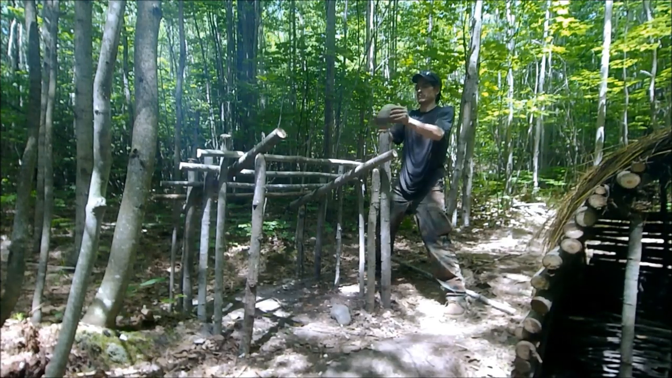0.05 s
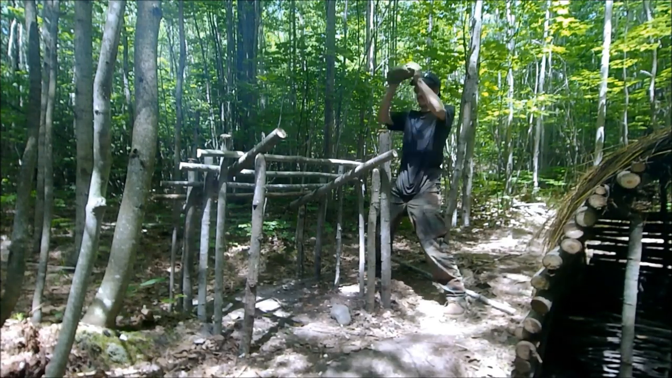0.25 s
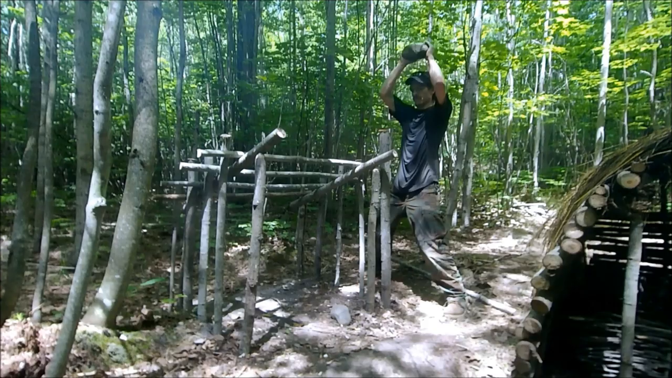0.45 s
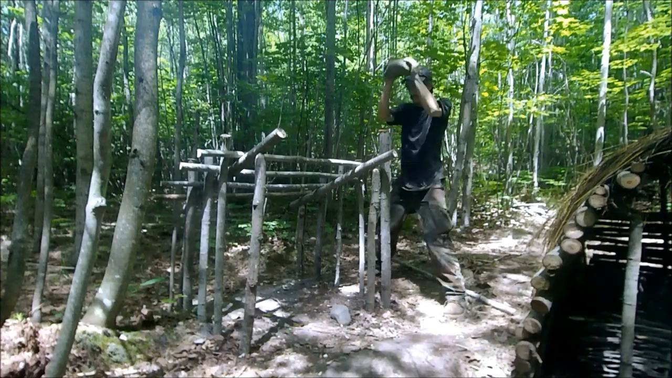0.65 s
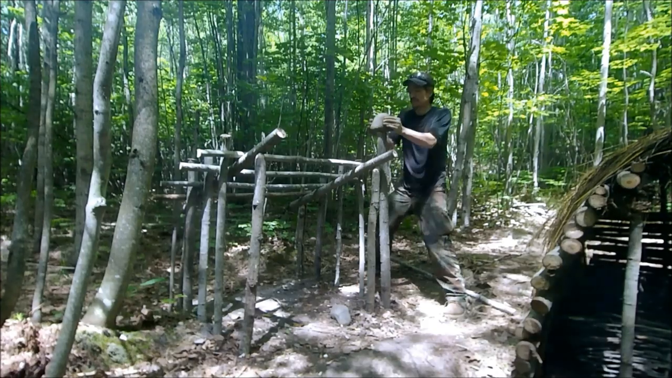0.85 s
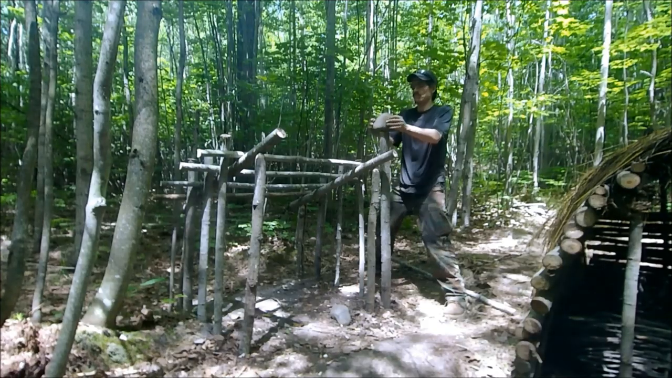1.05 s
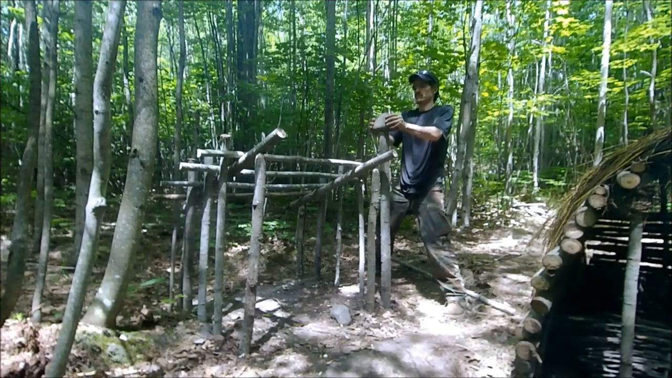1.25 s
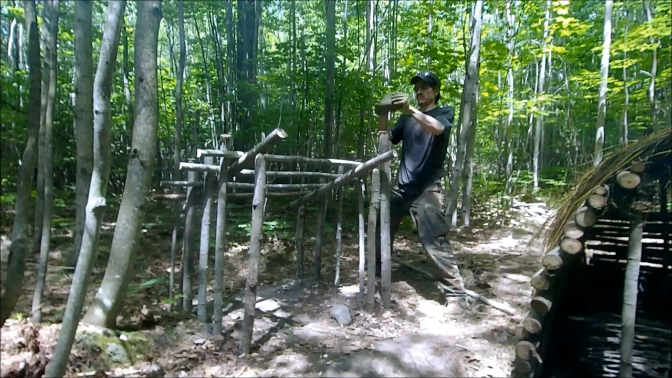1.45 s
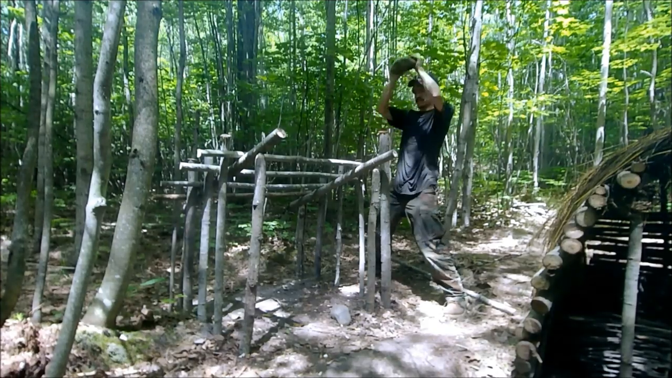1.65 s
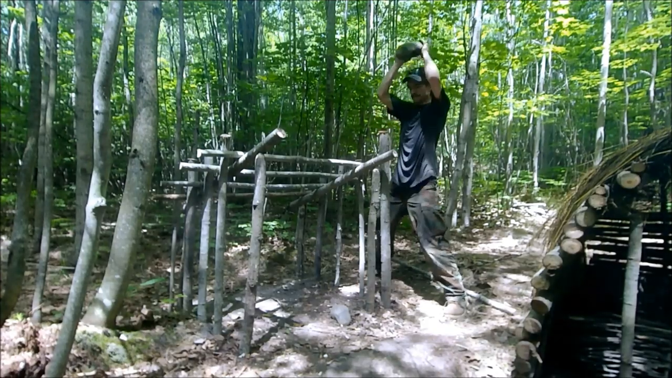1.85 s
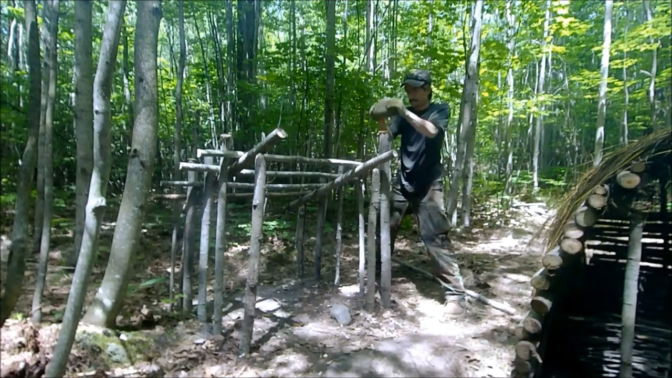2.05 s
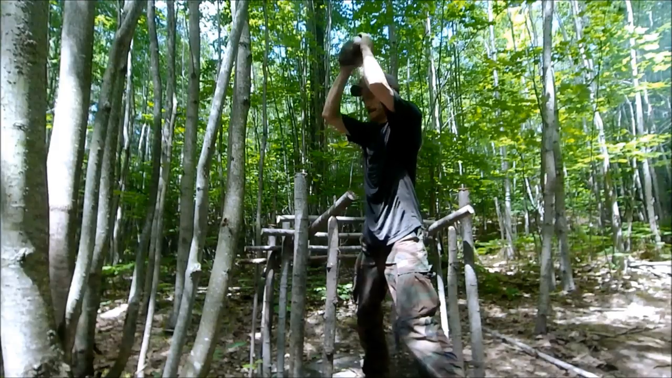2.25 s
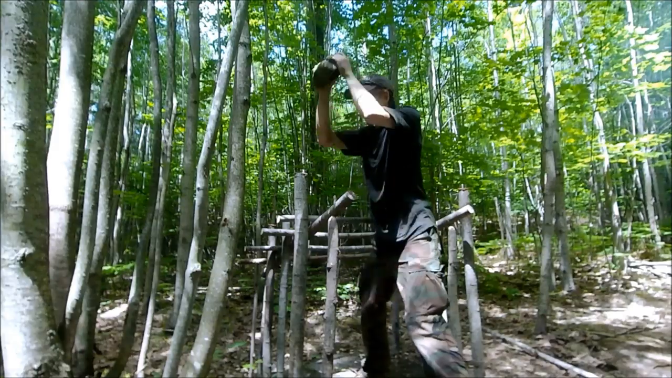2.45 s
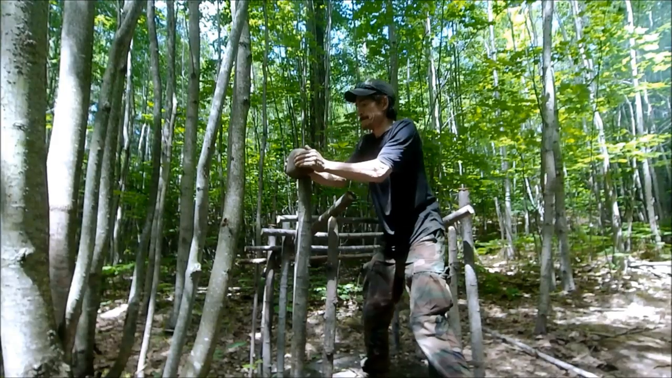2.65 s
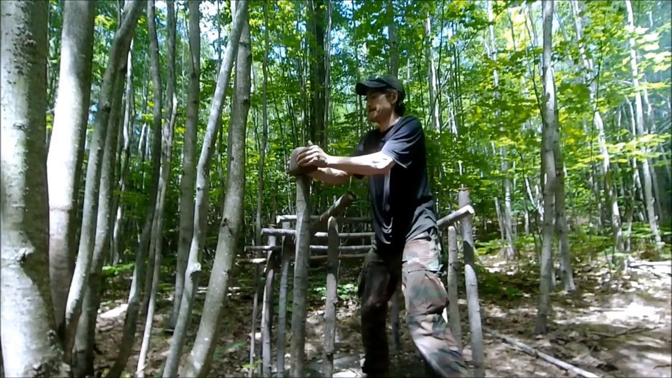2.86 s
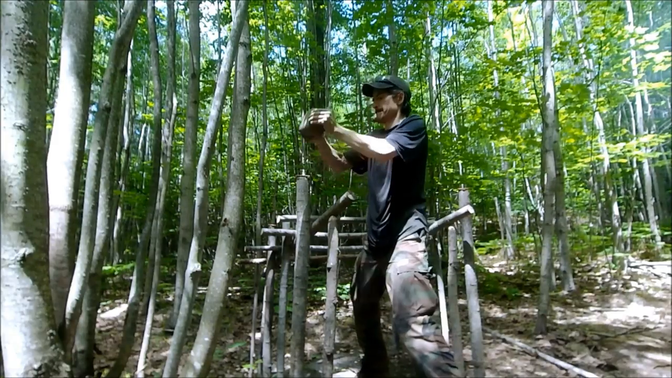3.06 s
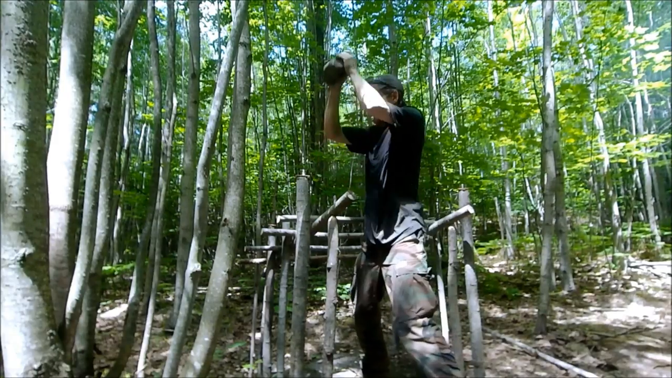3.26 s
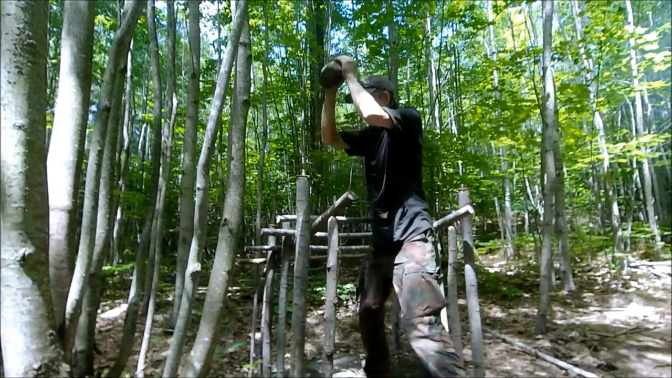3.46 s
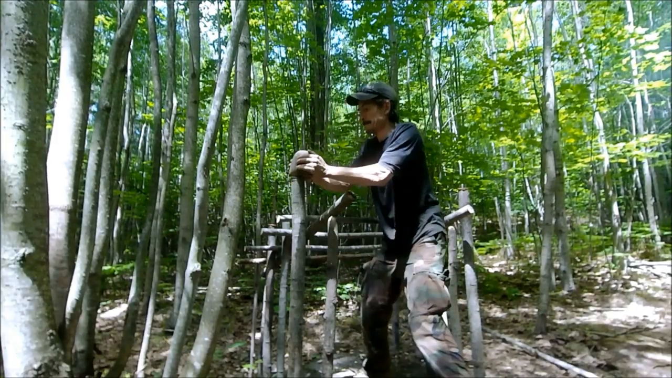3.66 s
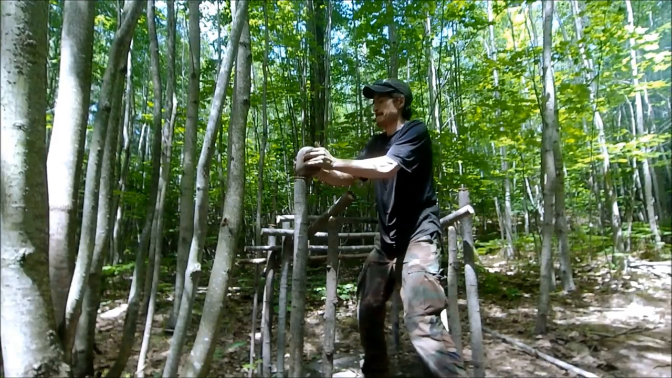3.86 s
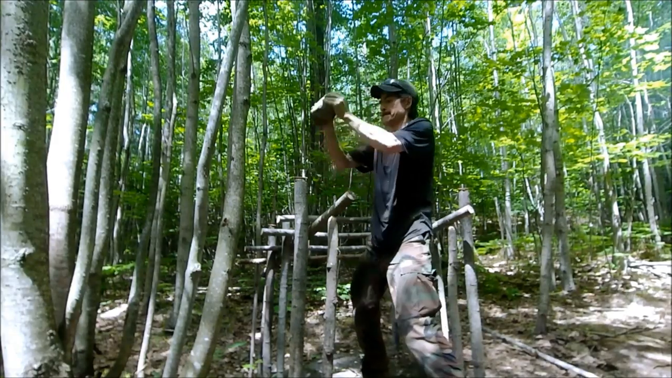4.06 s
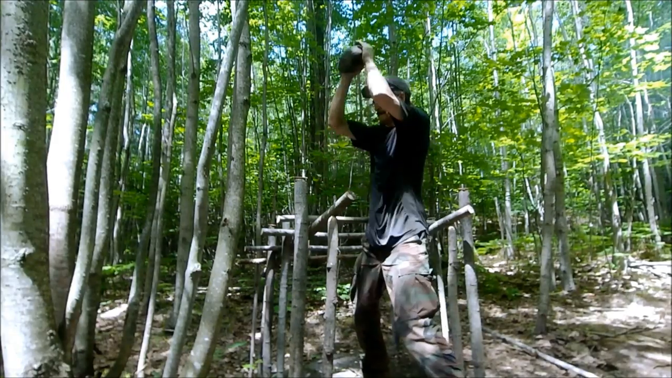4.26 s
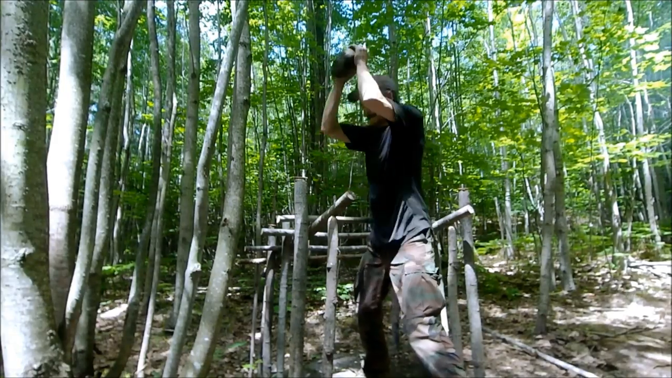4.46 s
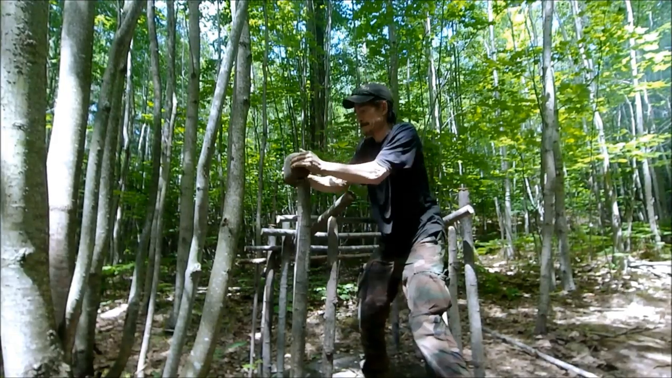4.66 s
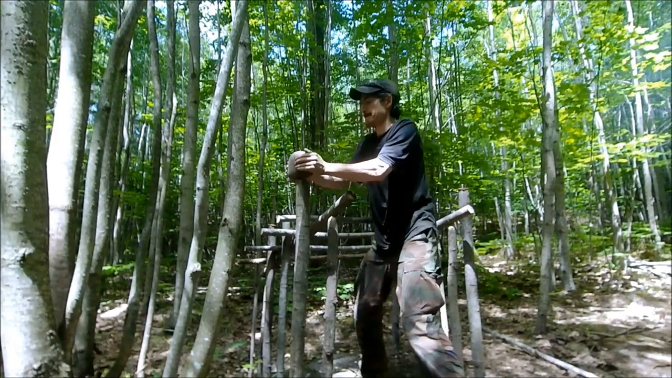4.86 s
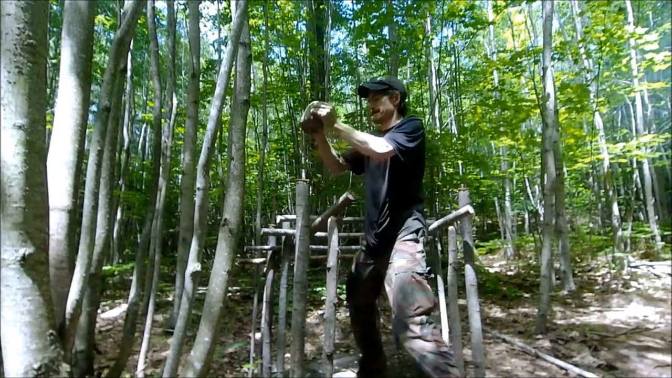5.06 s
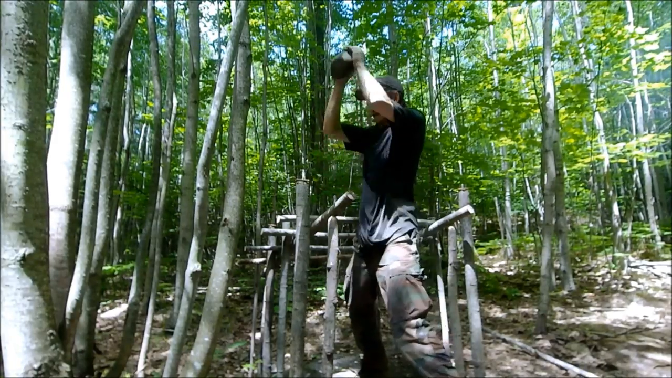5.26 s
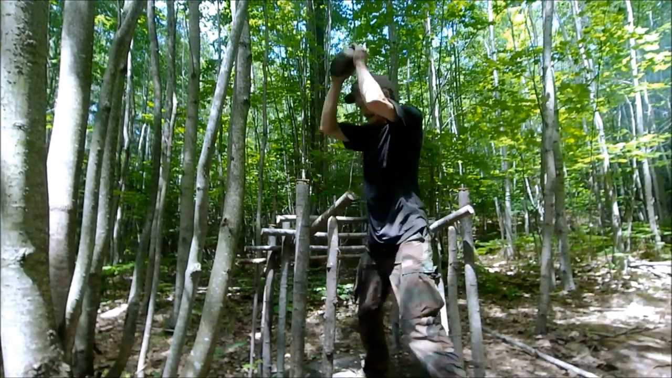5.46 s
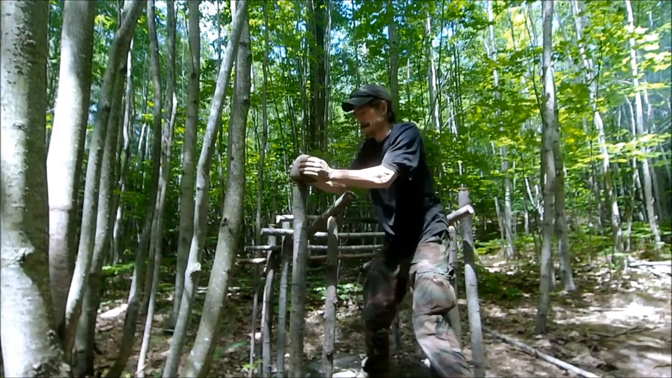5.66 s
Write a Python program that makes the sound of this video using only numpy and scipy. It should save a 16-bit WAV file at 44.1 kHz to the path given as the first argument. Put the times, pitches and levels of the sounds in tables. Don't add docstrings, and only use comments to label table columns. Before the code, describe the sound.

Two heavy stone blows on a wooden post come first, then a sudden cut to a nearer position and four drier, sharper ones, the last the heaviest and cut short by the ending. The outdoor microphone clips on each hit, and a diffuse woodland echo follows. Underneath are soft wind buffeting, leaf hiss, a faint insect fizz, distant bird slurs and regular high chips, plus tiny crumbs of grit.

```python
import sys
import numpy as np
from scipy import signal
from scipy.fft import rfft, irfft, next_fast_len
from scipy.io import wavfile
from scipy.ndimage import map_coordinates

SR = 44100
rng = np.random.default_rng(int(sys.argv[2]) if len(sys.argv) > 2 else 0)


def gain_from_db(level_db):
    decades = np.asarray(level_db, float) / 20
    return 10 ** decades


def transcribe(signal):
    frames = np.atleast_2d(signal).T
    limited = np.clip(frames, -1, 1)
    pcm = np.round(limited * 32767).astype(np.int16)
    wavfile.write(sys.argv[1], SR, pcm)


N = 252252
SCENE_CHANGE = 2.312
TOP_HZ = 15800

# time in seconds, level in dB.
GUSTS = [
    (0, -54.5),
    (0.651, -52.5),
    (1.3, -55.5),
    (2.332, -51.5),
    (3.3, -53),
    (4.099, -52),
    (4.501, -54.5),
    (5.2, -51.5),
    (5.72, -56.5),
]
# frequency in Hz, density in dB per Hz.
RUMBLE_COLOUR = [(20, -22.5), (32, -0.5), (62, -4.5), (99, -10), (125, -15), (200, -22.5), (500, -60)]
# frequency in Hz, density in dB per Hz.
LEAF_COLOUR = [(120, -30.5), (200, -6.5), (300, -3.5), (600, -6), (950, -8.5), (2200, -11), (4700, -12.5),
               (10000, -12), (16000, -8.5)]
# frequency in Hz, level in dB.
CAMERA_WHINE = [(14998, -75.5)]

# start in seconds, level in dB.
THIN_CALLS = [(.25, -68), (.575, -67), (1.205, -67), (1.555, -68), (2.575, -68), (2.95, -68), (3.232, -66),
              (4.505, -67), (5.12, -66), (5.45, -68)]
# start within the phrase in seconds, length in seconds, from Hz, to Hz, level in dB.
SONG_PHRASE = [
    (0, .028, 3680, 4950, -4),
    (.028, .042, 4485, 2555, 0.5),
    (.066, .04, 2590, 2400, -4),
    (.178, .045, 4490, 2750, 2),
    (.23, .03, 3200, 3600, -1.5),
    (0.26, .075, 3600, 2602, -4.5),
]
# start in seconds, width of the pitch swings as a ratio, level in dB.
SONG_TIMES = [
    (.34, .8, -61.5),
    (3.277, 1.0, -58),
]
# start in seconds, length in seconds, from Hz, to Hz, level in dB.
SINGLE_SLURS = [(0.295, 0.027, 3397, 2800, -71), (1.185, 0.078, 3400, 3547, -62),
                (1.247, .075, 3450, 3896, -63.5), (1.341, 0.037, 3600, 3320, -61.5),
                (1.38, .03, 3400, 2850, -58.5), (1.36, 0.088, 3664, 3950, -66),
                (1.411, 0.08, 2902, 3200, -65.5), (2.274, 0.056, 3953, 3190, -66.5),
                (3.236, 0.023, 3575, 3770, -62), (3.246, .022, 3490, 2700, -62),
                (3.585, 0.043, 3490, 3580, -65), (4.612, 0.033, 3630, 5356, -60),
                (4.672, .065, 5030, 2905, -56), (4.751, .07, 4420, 3306, -58.5),
                (4.819, .05, 3300, 2650, -60.5)]
# time in seconds, frequency in Hz, level in dB.
CHIP_GLIDE = [
    (0, 9260, -8.5),
    (.012, 8200, -3),
    (.015, 6100, -19.5),
    (.018, 5700, -8.5),
    (.027, 4700, -6),
]
# start in seconds, level in dB.
CHIP_TIMES = [(2.582, -58), (3.048, -55), (3.512, -55), (3.922, -58), (4.393, -57), (4.793, -57),
              (5.178, -55), (5.578, -56)]

# start in seconds, low post modes in dB, crack in dB, first click in dB.
ROCK_BLOWS = [
    (0.7746, -3, -17.5, -30.5),
    (2.1074, -1.5, -17.5, -30),
    (2.6358, -1, -15.5, -20.5),
    (3.644, -0.5, -9.5, -30.5),
    (4.6737, 0, -13, -24),
    (5.6787, 2.5, -15, -25.5),
]
# frequency in Hz, signed size, t60 in seconds, arrival in seconds.
SOIL_WAVES = [
    [(44.8, -.32, .14, .0034), (71.9, 1.02, .073, .0034), (118, -1.01, .048, .0034),
     (194, -.34, .073, .0034), (75, -.19, .14, .0355)],
    [(47.6, -.51, .081, .0042), (70, .23, .16, .0042), (98.6, .96, .082, .0042), (228, -2.6, .011, .0042),
     (125, -.13, .03, .0275)],
]
# frequency in Hz, signed size, t60 in seconds.
POST_MODES = [
    [(427, 1.11, .027), (678.3, -4.5, 0.023), (930, 1.2, 0.016), (1163, 0.46, 0.026), (1267, 0.54, 0.018),
     (1474, 1.43, 0.023), (1820, 1.42, 0.017)],
    [(478, 9.5, 0.014), (663, 1.8, 0.025), (794, -12.5, 0.0058), (894, 1.1, 0.022), (1067, 0.5, .025),
     (1157, 0.5, .015), (1267, -0.24, 0.029), (1430, -5.5, 0.012), (1585, 5, 0.015), (2050, 0.21, 0.026),
     (2400, 0.49, 0.027), (2650, 1, 0.017), (4050, .5, .016)],
]
# lag in seconds, signed size.
KNOCK_BOUNCE = [
    (.0014, -1.5),
    (.001, 1.22),
]
# frequency in Hz, density in dB per Hz.
CRACK_COLOUR = [(500, -30), (1100, -10.5), (1700, -11), (2600, -10.5), (4400, -16), (8000, -25.5),
                (16000, -44)]
# frequency in Hz, density in dB per Hz.
TRUNK_COLOUR = [(40, -20.5), (80, -5.5), (150, -9.5), (350, -21.5), (700, -10.5), (1000, -14),
                (1500, -16.5), (2400, -22.5), (4500, -28.5), (9000, -36.5), (16000, -41)]
# frequency in Hz, t60 in seconds.
TRUNK_DECAY = [(60, 0.57), (400, 0.23), (2000, 0.26), (6000, 0.29), (15000, 0.25)]
# frequency in Hz, density in dB per Hz.
DEEP_COLOUR = [(30, -5.5), (80, 0), (300, -23.5), (500, -22), (950, -13), (1500, -13), (3200, -21.5),
               (16000, -50)]
# frequency in Hz, t60 in seconds.
DEEP_DECAY = [(60, 0.42), (400, 1.4), (1000, 1.1), (2000, 0.72), (4000, 1.1), (15000, 0.46)]

# start in seconds, peak in dB, centre in Hz, width in octaves, woody body in dB.
GRIT_TICKS = [(0.9557, -35.5, 8430, 0.52, -6), (1.004, -27.5, 8900, 0.64, -15),
              (1.0534, -31.5, 9700, 0.33, -11.5), (1.09, -38.5, 11150, 1.6, -10), (1.49, -53, 927, .8, -14),
              (1.534, -36.5, 14500, 0.2, -28), (1.6088, -37.5, 5600, 0.38, -9.5),
              (1.6323, -33.5, 7810, 0.89, -24), (1.708, -48.5, 7320, 1.2, -1),
              (1.9954, -47.5, 6940, 0.72, -12), (2.454, -40.5, 1190, 1.1, -3), (2.623, -54, 2990, 0.55, -1),
              (3.621, -57, 3025, 0.48, 3.5), (3.9, -41.5, 9240, 0.8, -8), (4.1747, -37, 10980, 0.25, -3.5),
              (5.671, -46, 1900, .3, -2)]
# start in seconds, length in seconds, level in dB, lowest Hz.
ROCK_GRATES = [
    (2.854, 0.046, -48, 3933),
    (3.885, .04, -59.5, 5030),
    (4.826, 0.061, -50, 5588),
    (4.902, 0.028, -67.5, 6200),
]


def unit(x):
    return x / np.sqrt(np.mean(x ** 2) + 1e-20)


def along(points, hz):
    f, value = np.transpose(points)
    return np.interp(np.log(hz + 1), np.log(f + 1), value)


def wobble(rate):
    knots = rng.standard_normal(int(N * rate / SR) + 4)
    return map_coordinates(knots, [np.arange(N) * rate / SR])


def noise(size, gain):
    m = next_fast_len(size + 4096)
    spectrum = rfft(rng.standard_normal(m)) * gain(np.fft.rfftfreq(m, 1 / SR))
    return unit(irfft(spectrum, m)[:size])


def hump(size, centre_hz, octaves):
    return noise(size, lambda f: np.exp(-.5 * (np.log2((f + 1) / centre_hz) / octaves) ** 2))


def fading(t60s, colour):
    burst = noise(SR, lambda f: gain_from_db(along(colour, f)))
    hz, t, z = signal.stft(burst, SR, nperseg=256)
    decay = gain_from_db(-60 * t / along(t60s, hz)[:, None])
    return signal.istft(z * decay, SR, nperseg=256)[1][:SR]


def add(out, s, sound):
    part = out[round(s * SR):][:len(sound)]
    part += sound[:len(part)]


def forest():
    t = np.arange(N) / SR
    wind_db = np.interp(t, *np.transpose(GUSTS))
    rumble = noise(N, lambda f: gain_from_db(along(RUMBLE_COLOUR, f)))
    wind = gain_from_db(wind_db - 5.5 + 0.73 * wobble(4) + wobble(12)) * rumble
    pushes = gain_from_db(4 * wobble(11)) * hump(N, 10, .75)
    wind = wind + gain_from_db(wind_db + 5) * unit(pushes)

    leaves_db = -63 + 0.34 * (wind_db - wind_db.mean())
    hiss = noise(N, lambda f: gain_from_db(along(LEAF_COLOUR, f)) * (f < TOP_HZ))
    leaves = gain_from_db(leaves_db + 0.52 * wobble(2.2)) * hiss

    fizz = noise(N, lambda f: np.exp(-.5 * ((f - 14000) / 900) ** 2) * (f < TOP_HZ))
    insects = gain_from_db(-71 + 3 * wobble(70) + wobble(4)) * fizz

    whine = np.zeros(N)
    for hz, db in CAMERA_WHINE:
        whine += gain_from_db(db + 0.5 + 1.5 * wobble(14)) * np.sin(2 * np.pi * hz * t)
    settling = gain_from_db(-42) * np.exp(-t / .005)
    return wind + leaves + insects + whine + settling


def whistle(note):
    s, hz, db = np.transpose(note)
    t = np.arange(s[0], s[-1], 1 / SR)
    phase = 2 * np.pi * np.cumsum(np.interp(t, s, hz)) / SR
    ends = np.clip(np.minimum(t - s[0], s[-1] - t) / .003, 0, 1)
    return gain_from_db(np.interp(t, s, db)) * np.sin(phase) * ends


def slur(length, from_hz, to_hz):
    ease = 1.5
    quaver, quaver_hz = .2, 45
    u = np.arange(0, length, 1 / SR) / length
    hz = from_hz + (to_hz - from_hz) * (1 - np.exp(-ease * u)) / (1 - np.exp(-ease))
    hz = hz * (1 + quaver * length * u * np.sin(2 * np.pi * quaver_hz * length * u))
    return np.sin(np.pi * u) ** .5 * np.sin(2 * np.pi * np.cumsum(hz) / SR)


def through_trunks(x, room):
    return signal.fftconvolve(x, room / np.linalg.norm(room))[:N]


def birds():
    far, thin = np.zeros(N), np.zeros(N)
    for s, db in THIN_CALLS:
        add(thin, s, gain_from_db(db) * whistle([(0, 10090, -10.5), (.012, 9190, 1.5), (.028, 8900, 3)]))
    pivot_hz = 2480
    for start, swing, phrase_db in SONG_TIMES:
        for s, length, from_hz, to_hz, db in SONG_PHRASE:
            start_hz = pivot_hz + swing * (from_hz - pivot_hz)
            end_hz = pivot_hz + swing * (to_hz - pivot_hz)
            add(far, start + s, gain_from_db(phrase_db + db) * slur(length, start_hz, end_hz))
    for s, length, from_hz, to_hz, db in SINGLE_SLURS:
        add(far, s, gain_from_db(db) * slur(length, from_hz, to_hz))
    for s, db in CHIP_TIMES:
        add(far, s, gain_from_db(db) * whistle(CHIP_GLIDE))
    flat = [(100, 0), (20000, 0)]
    long_tail = fading([(2500, 1.0), (9000, 0.89)], flat)
    short_tail = fading([(9000, .15)], flat)
    return gain_from_db(-6.5) * far + gain_from_db(7.5) * through_trunks(far, long_tail) + through_trunks(thin, short_tail)


def ring(t, hz, t60, rise):
    out, live = np.zeros(len(t)), (t > 0) & (t < 2 * t60)
    u = t[live]
    out[live] = np.sin(2 * np.pi * hz * u) * gain_from_db(-60 * u / t60) * (1 - np.exp(-u / rise))
    return out


def soil_thud(t, stand):
    return sum(size * ring(t - late, hz, t60, 0.00078) for hz, size, t60, late in SOIL_WAVES[stand])


def post_knock(t, stand, low_db, high_db):
    lag, bounce = KNOCK_BOUNCE[stand]
    knock = np.zeros(len(t))
    for hz, size, t60 in POST_MODES[stand]:
        db = low_db
        if hz >= 800:
            db = high_db + rng.normal(0, 2)
            hz = hz * rng.normal(1, .015)
        both = ring(t, hz, t60, 0.0071) + bounce * ring(t - lag, hz, t60, 0.006)
        knock += size * gain_from_db(db) * both
    return knock


def stone_click(t):
    return noise(SR, lambda f: f / (f + 2500) * (f < 16200)) * gain_from_db(-60 * np.abs(t - .001) / .006)


def stone_crack(t):
    burst = noise(SR, lambda f: gain_from_db(along(CRACK_COLOUR, f)) * (f < TOP_HZ))
    crackle_db = 3 * rng.standard_normal(SR // 40 + 1).repeat(40)[:SR]
    return burst * gain_from_db(crackle_db - 60 * t / 0.037) * (1 - np.exp(-t / 0.00091))


def trunk_echo(t, near_db, deep_db):
    near = gain_from_db(near_db) * fading(TRUNK_DECAY, TRUNK_COLOUR)
    deep = gain_from_db(deep_db) * fading(DEEP_DECAY, DEEP_COLOUR)
    return (near + deep) * (1 - np.exp(-t / 0.0017))


def low_boom(t, stand):
    level_db = [-30.5, -38][stand]
    return hump(SR, 85, 0.55) * gain_from_db(level_db - 60 * t / .55) * (1 - np.exp(-t / .04))


def blows():
    out, t = np.zeros(N), np.arange(SR) / SR
    for s, low_db, crack_db, click_db in ROCK_BLOWS:
        stand = int(s > SCENE_CHANGE)
        sharper_db = crack_db + 15
        blow = soil_thud(t, stand) + post_knock(t, stand, low_db, -2.4 + sharper_db)
        blow += gain_from_db(click_db) * stone_click(t) + gain_from_db(crack_db) * stone_crack(t)
        blow += trunk_echo(t, -27 + 0.67 * sharper_db, -43 + sharper_db)
        blow += low_boom(t, stand)
        heard = (s > SCENE_CHANGE) | (s + t < SCENE_CHANGE)
        add(out, s, heard * blow)
    return out


def grit():
    out, t = np.zeros(N), np.arange(SR // 10) / SR
    for s, db, hz, octaves, body_db in GRIT_TICKS:
        snap = hump(len(t), hz, octaves) + gain_from_db(body_db) * hump(len(t), 2100, 0.53)
        decay = gain_from_db(-60 * t / 0.008) + gain_from_db(-19.5 - 60 * t / .08)
        add(out, s, gain_from_db(db - 5.0) * snap * decay)
    for s, length, db, start_hz in ROCK_GRATES:
        def scrape(f):
            edge = 1 / (1 + (start_hz / (f + 1)) ** 8) / (1 + f / 6000)
            peak = 1 + 1.6 * np.exp(-.5 * ((f / start_hz - 1.12) / 0.072) ** 2)
            return edge * peak
        stroke = np.sin(np.pi * np.clip(t / length, 0, 1)) ** 1.3
        add(out, s, gain_from_db(db) * noise(len(t), scrape) * stroke)
    return out


def scene():
    return (forest() + birds() + blows() + grit())[None]


def top_cut(x):
    return signal.sosfilt(signal.butter(12, 16740, fs=SR, output="sos"), x)


def record(dry):
    overloaded = dry / (1 + np.abs(dry) ** 20) ** (1 / 20)
    low_pass = signal.butter(12, 16500, fs=SR, output="sos")
    limited = signal.sosfiltfilt(low_pass, overloaded)
    return top_cut(np.clip(limited, -1, 1))


dry = scene()
out = record(dry)
transcribe(out)
```